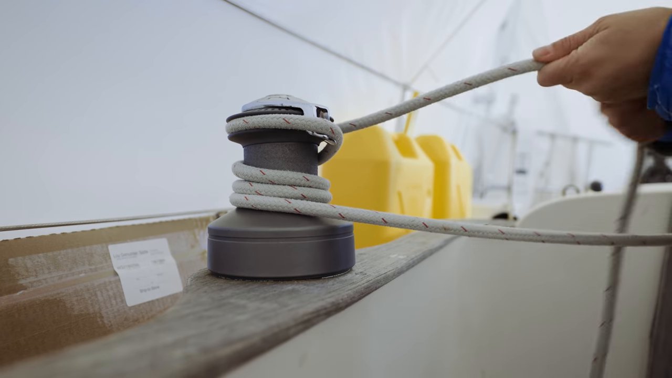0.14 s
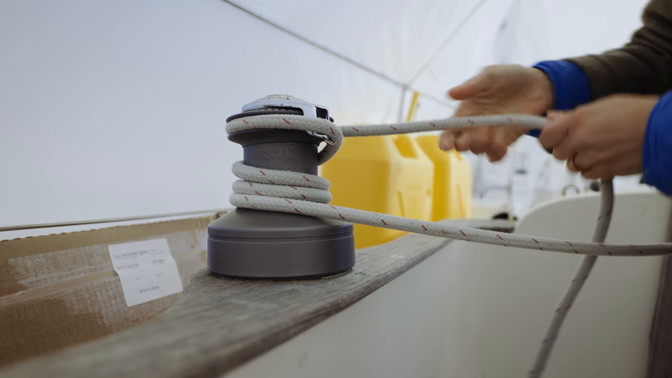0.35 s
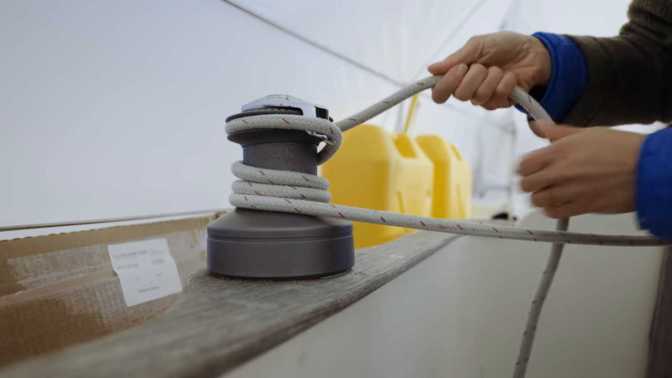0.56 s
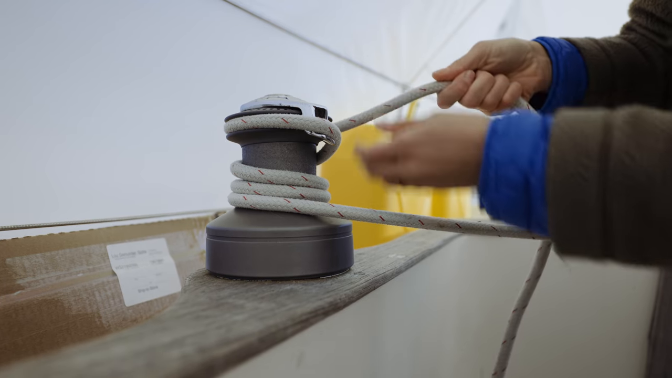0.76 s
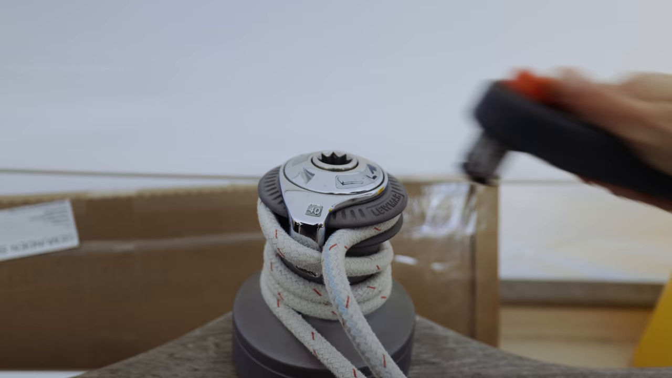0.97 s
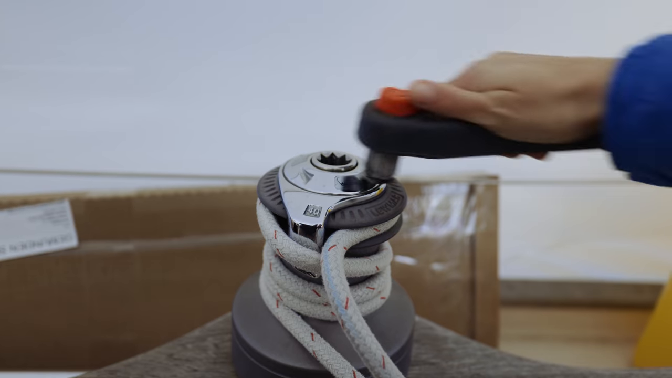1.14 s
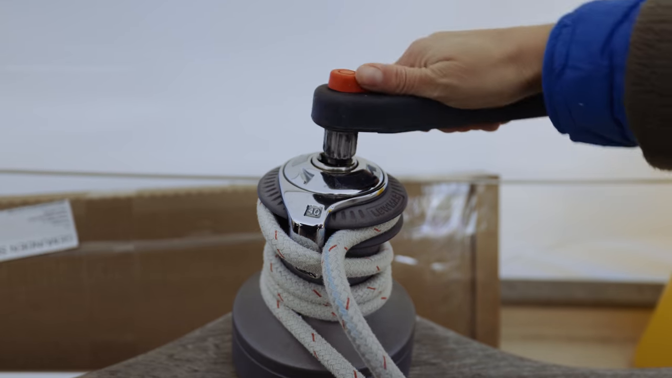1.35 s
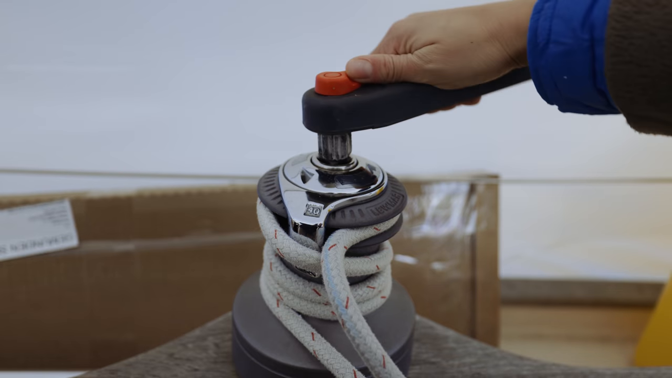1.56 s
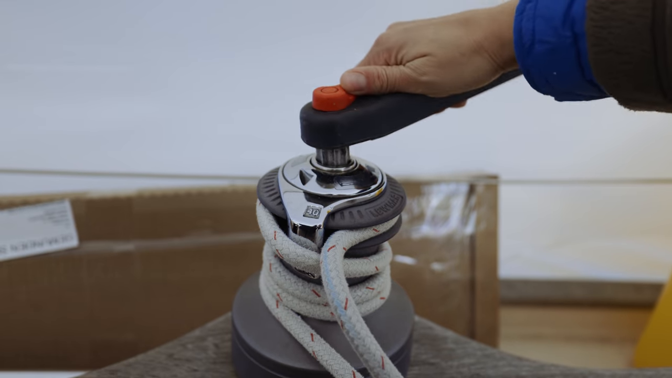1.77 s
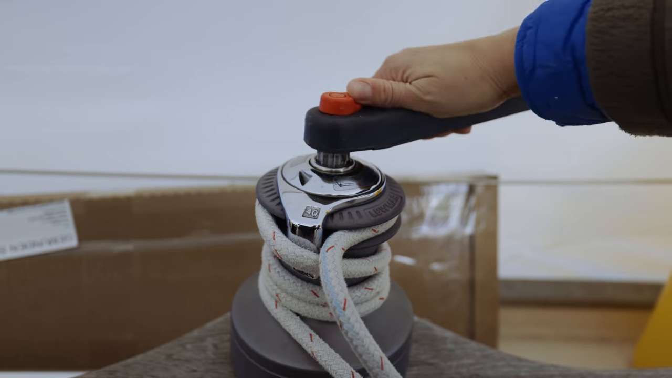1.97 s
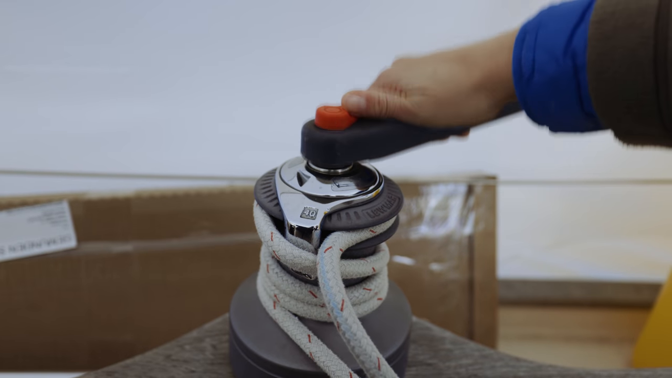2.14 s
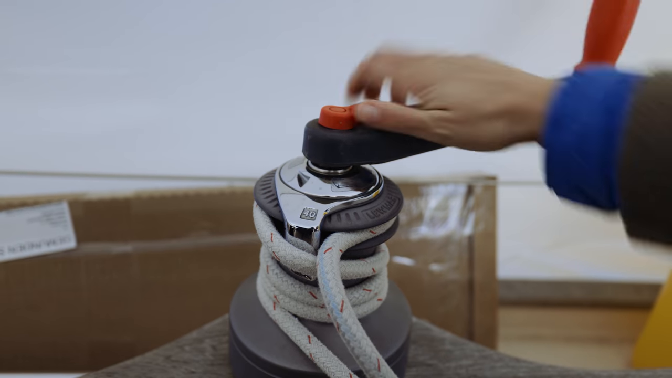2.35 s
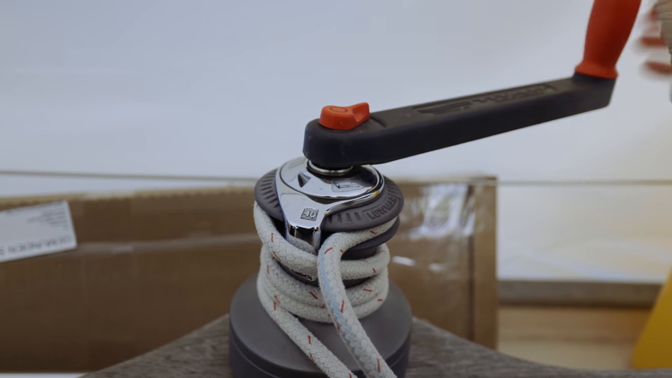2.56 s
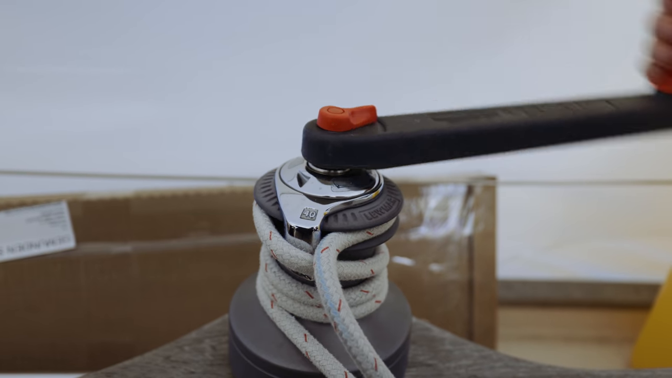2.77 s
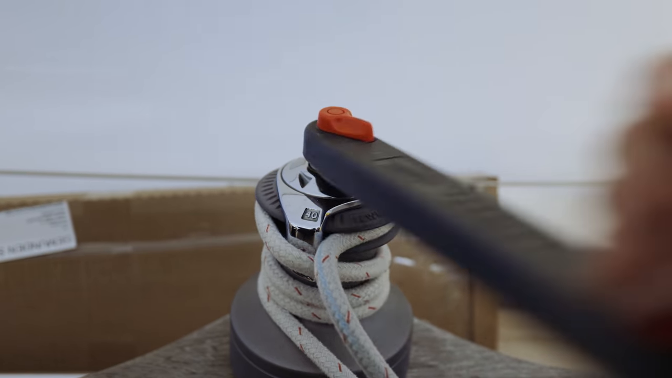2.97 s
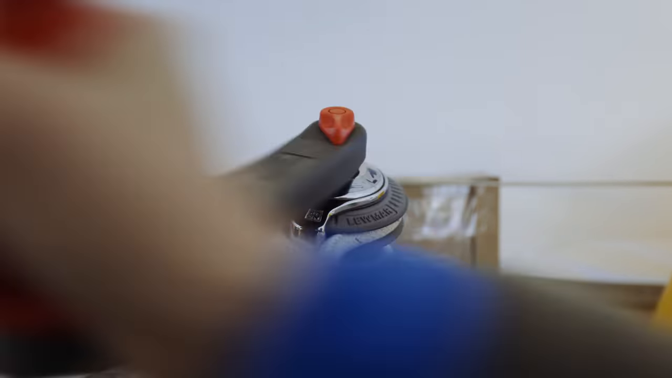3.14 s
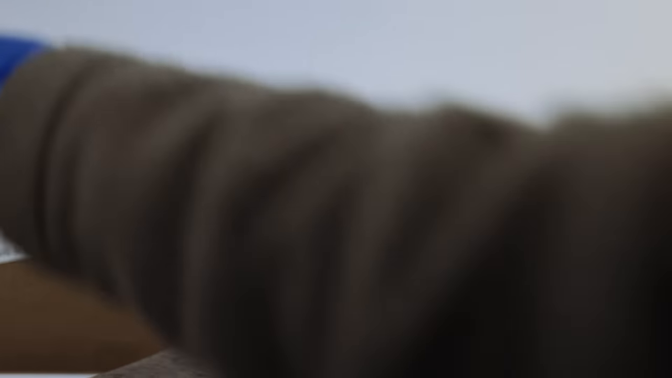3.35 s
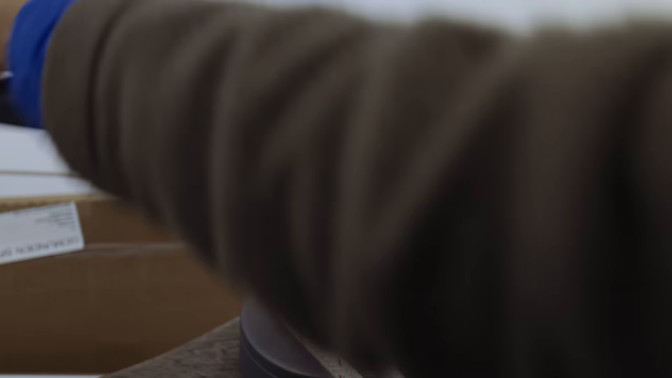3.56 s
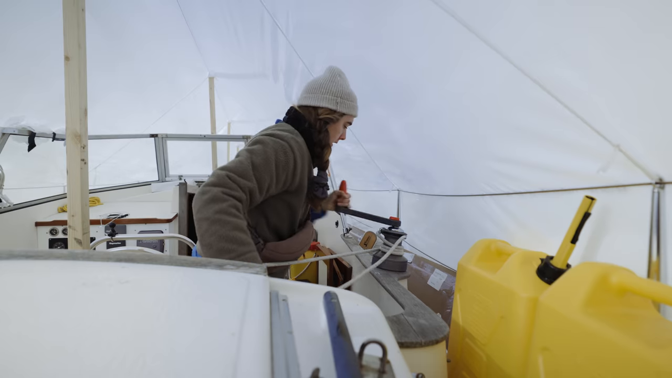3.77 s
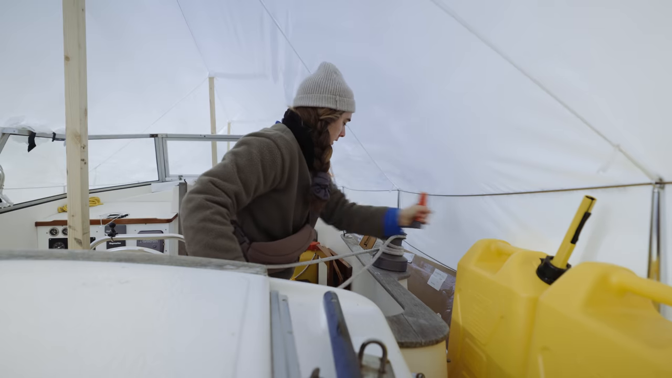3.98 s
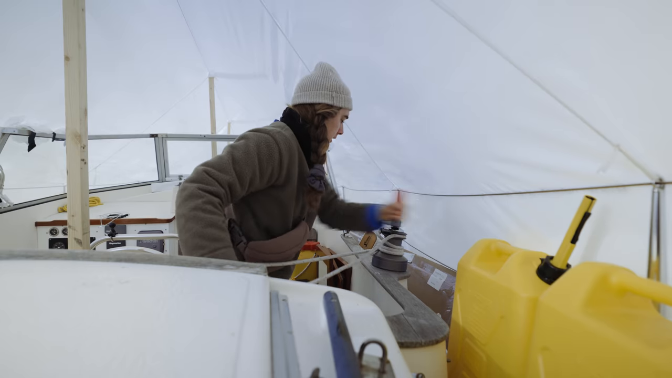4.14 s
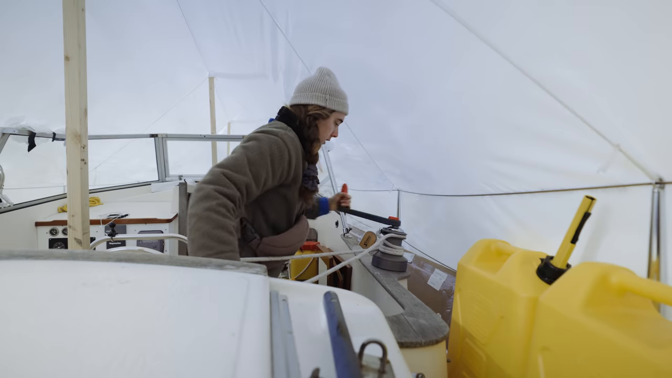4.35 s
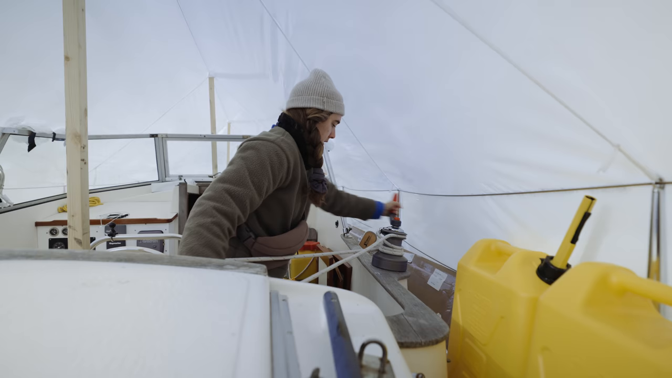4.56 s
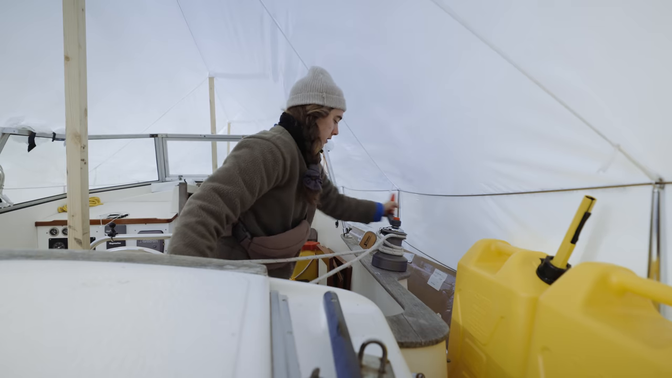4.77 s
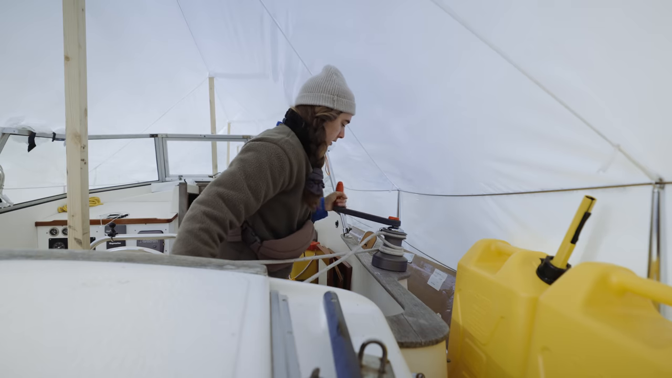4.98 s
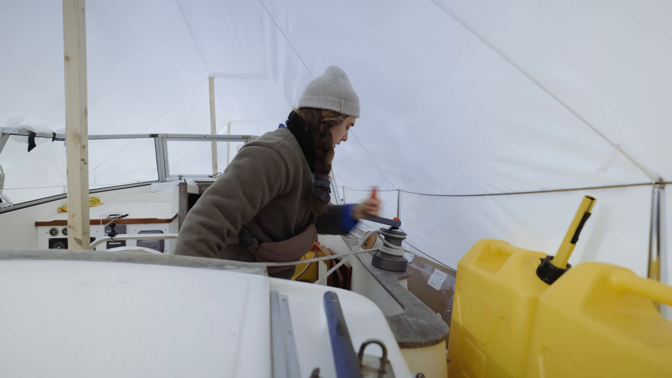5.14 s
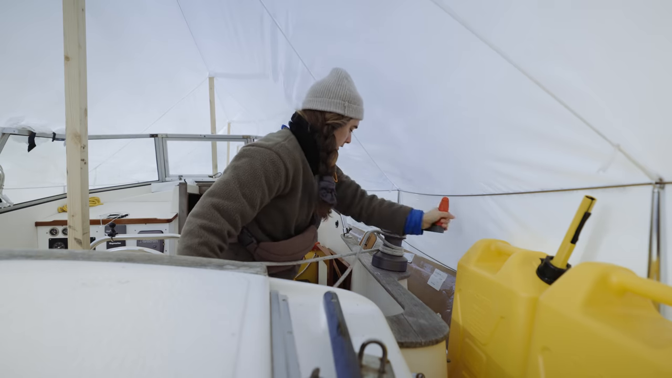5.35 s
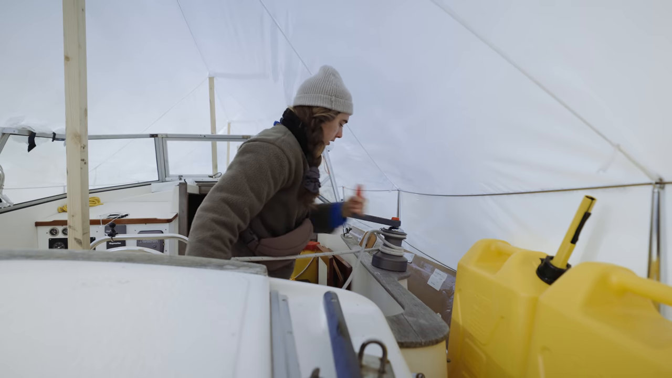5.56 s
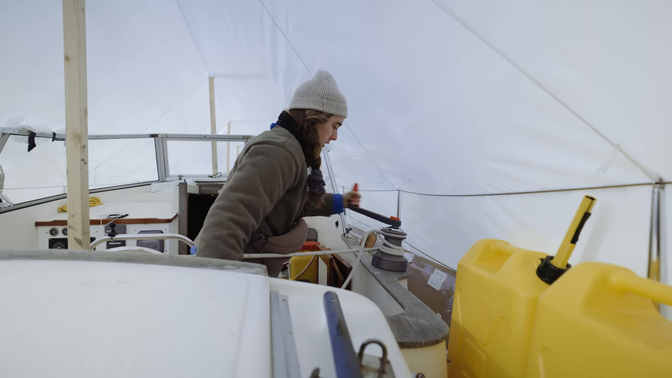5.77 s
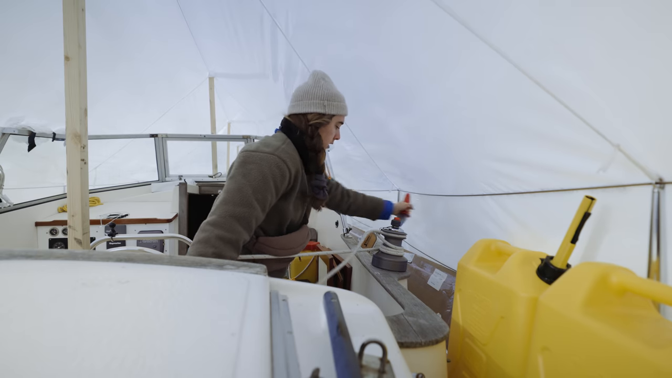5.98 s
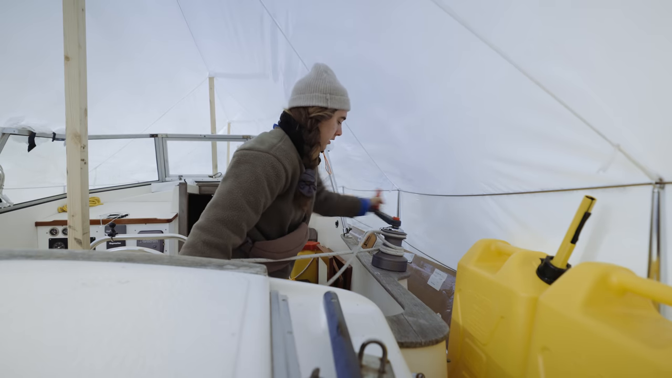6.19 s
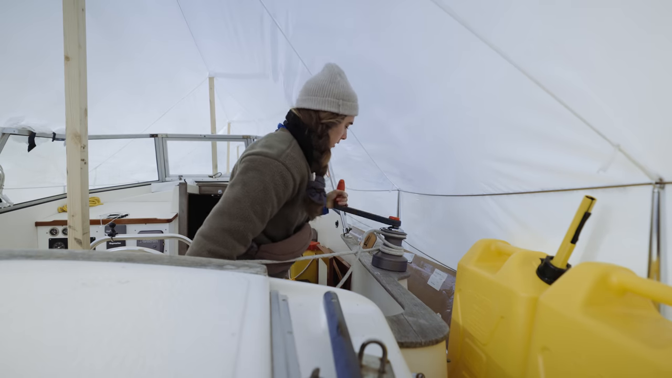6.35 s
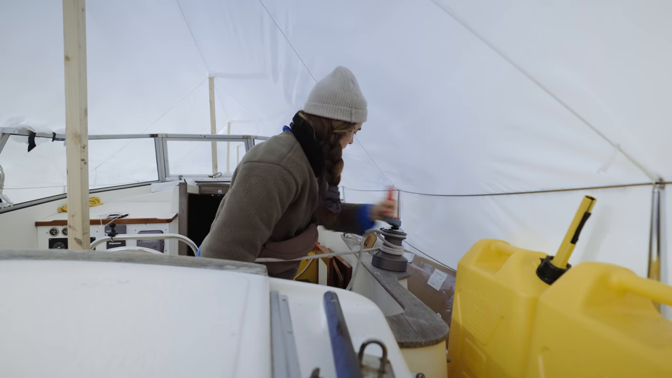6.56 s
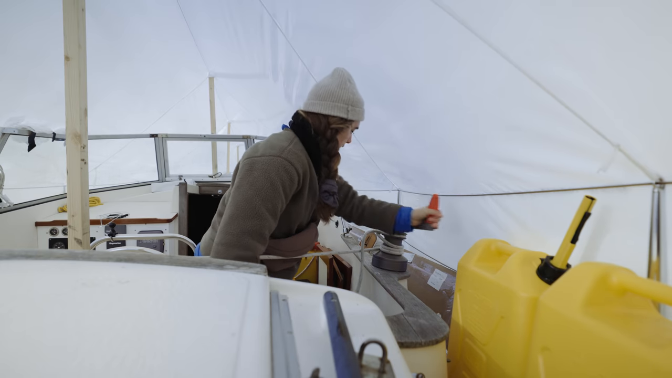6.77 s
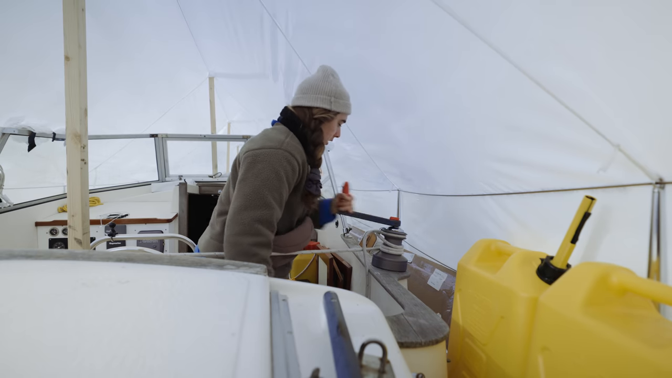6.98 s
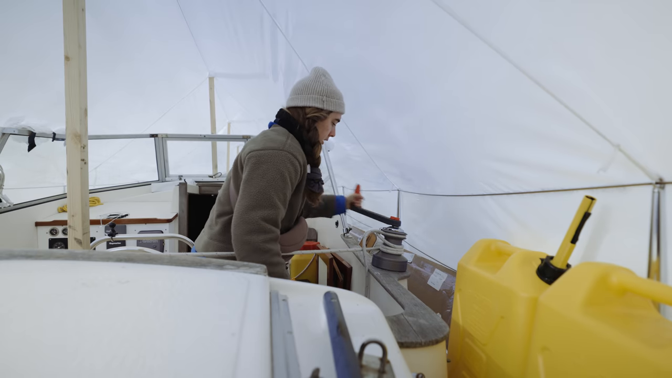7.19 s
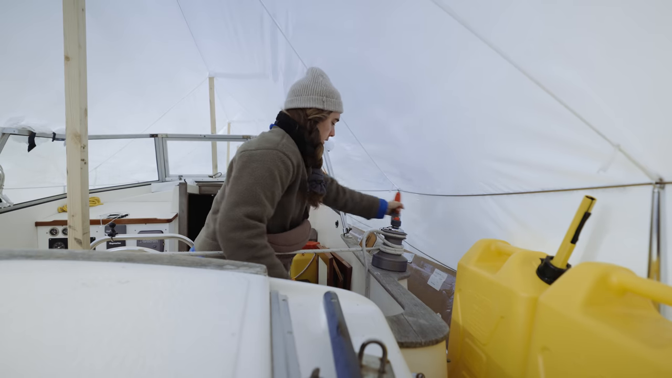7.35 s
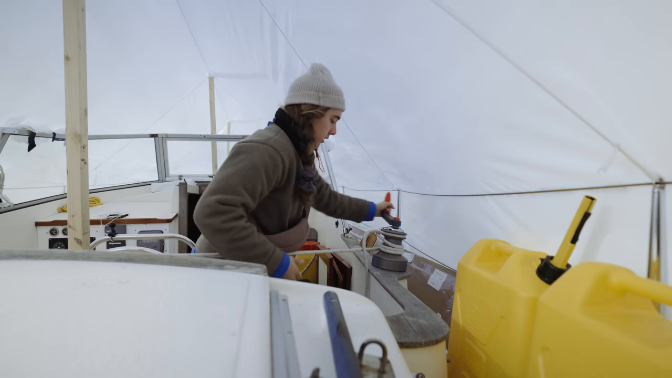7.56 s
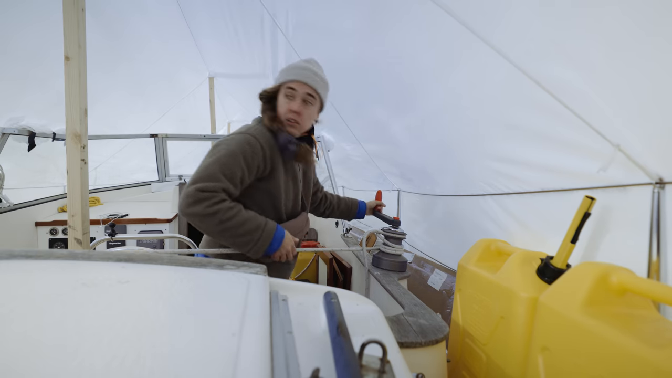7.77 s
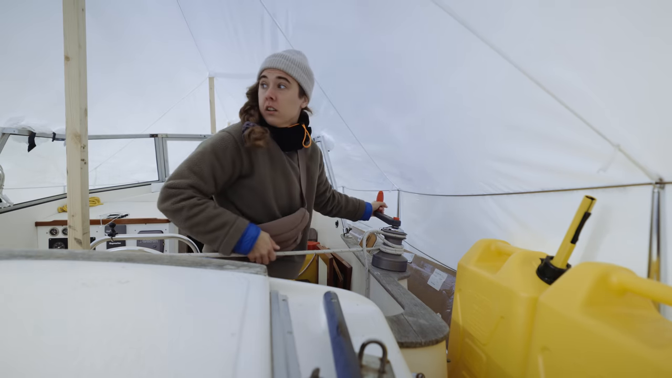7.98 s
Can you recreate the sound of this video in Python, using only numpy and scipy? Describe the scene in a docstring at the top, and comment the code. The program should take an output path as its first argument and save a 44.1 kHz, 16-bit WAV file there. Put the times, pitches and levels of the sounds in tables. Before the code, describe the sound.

A rope tug clicks the winch drum, its tail slapping and dragging briefly on deck. The handle bumps, ticks and snaps home. Then strokes of steel ratchet clicking alternate between two timbres, slower crisp high ticks and quicker ringing pings, with bearings whirring and hollow deck thumps at turnarounds. Close, detailed microphone, faint airy machinery background, small diffuse reflections from the thin cover.

```python
"""A two-speed deck winch under a plastic boat cover, in order of time. A rope tug spins the drum, which
clicks at once; the rope's tail slaps the deck and drags briefly. After one second the background fades
into a duller one without hum. The handle knocks and ticks as it is fitted and locked, then is cranked
to and fro: each direction trips its own pawls (struck, ringing steel), the bearings whirr (grainy noise)
and the gears clunk at the reversals. Knocks and pawls ring the hollow deck; the cover sends back echoes."""
import sys
import numpy as np
from scipy import signal
from scipy.fft import rfft, irfft, next_fast_len
from scipy.io import wavfile
from scipy.ndimage import map_coordinates

SR = 44100
rng = np.random.default_rng(int(sys.argv[2]) if len(sys.argv) > 2 else 0)


def wav_record(signal):
    """Record a signal, one row per channel, as 16-bit PCM in the file named by sys.argv[1]."""
    frames = np.transpose(np.atleast_2d(signal))
    bounded = np.clip(frames, -1, 1)
    # unit amplitude maps onto the largest positive 16-bit level
    quanta = np.round(bounded * 32767).astype(np.int16)
    wavfile.write(sys.argv[1], SR, quanta)


N = 353682  # length in samples, about 8 s


def amp(db):
    """Turns decibels into a plain factor."""
    return 10 ** (np.asarray(db) / 20)


def unit(x):
    """Scales a sound to an average (rms) strength of 1."""
    return x / np.sqrt(np.mean(x ** 2) + 1e-20)


def along(points, hz):
    """Reads a curve of (f/Hz, value) points on a logarithmic pitch axis."""
    f, value = np.transpose(points)
    return np.interp(np.log(hz + 1), np.log(f + 1), value)


def wobble(rate):
    """A smooth random curve with rate random points a second."""
    points = rng.standard_normal(int(N * rate / SR) + 4)
    return map_coordinates(points, [np.arange(N) * rate / SR])


def coloured(x, spectrum):
    """Gives x a tone colour with a filter that never rings ahead and keeps white noise at its rms."""
    size = 2048
    cepstrum = irfft(np.log(amp(along(spectrum, np.fft.rfftfreq(size, 1 / SR))) + 1e-6), size)
    # fold the second half onto the first: the filter then acts only after the sound
    cepstrum[1:size // 2] *= 2
    cepstrum[size // 2 + 1:] = 0
    kernel = irfft(np.exp(rfft(cepstrum)), size)
    return signal.fftconvolve(x, kernel / np.linalg.norm(kernel))[:N]


def add(track, s, sound):
    """Mixes a sound into the track at s seconds."""
    part = track[round(max(s, 0) * SR):][:len(sound)]
    part += sound[:len(part)]


def burst(spread):
    """Noise that swells for spread seconds (at least 0.2 ms) and dies away."""
    u = np.arange(SR // 8) / SR / max(spread, 2e-4)
    return u * np.exp(1 - u) * rng.standard_normal(len(u))


def ring(modes, attack, scatter_db, detune):
    """Damped modes struck together, each with a new strength and slightly shifted pitch; close ones beat."""
    hz, db, t60 = np.transpose(modes)[:, :, None]
    t = np.arange(int(SR * t60.max())) / SR
    strength, shift, start = rng.standard_normal((3, len(hz), 1))
    phase = 2 * np.pi * hz * (1 + detune * shift) * t + .6 * start
    envelope = amp(db + scatter_db * strength - 60 * t / t60)
    return (envelope * np.sin(phase)).sum(axis=0) * (1 - np.exp(-t / attack))


# background before and after the crossfade: f/Hz, relative level per Hz/dB
FIRST_AIR = [(20, -46), (40, 9), (90, 1.5), (300, -5), (640, -14.5), (2500, -16.5), (3500, -6.5),
             (5400, -18.5), (15500, -23.5)]
LATER_AIR = [(20, -21.5), (60, -5.5), (135, -0.5), (400, -14.5), (565, -8.5), (750, -17), (996, -9.5),
             (1120, -14.5), (1290, -14), (2300, -20.5), (3500, -13.5), (4700, -25.5), (15500, -37)]
HUM_HZ, CHANGE_S = 267, 1.013


def yard():
    """Air and far machinery: wavering coloured noise; a thin hum fades out with the first background."""
    t = np.arange(N) / SR
    fade = np.clip((t - CHANGE_S) / 0.25, 0, 1) * np.pi / 2
    first, later = (coloured(amp(wobble(26) / 2 + wobble(56)) * rng.standard_normal(N), spectrum)
                    for spectrum in (FIRST_AIR, LATER_AIR))
    hum = np.sin(2 * np.pi * HUM_HZ * t + 0.29 * wobble(5.6)) * amp(2.5 * wobble(8.7))
    return np.cos(fade) * (amp(-63.5) * first + amp(-66.0) * hum) + np.sin(fade) * amp(-58.5) * later


# what the thin sheet sends back: f/Hz, relative level/dB
ECHO = [(60, -11.5), (300, -0.5), (3500, -15.5), (6000, -4.5), (16000, -14)]
# how long the echo takes to fall by 60 dB: f/Hz, t60/s
COVER_DECAY = [(150, 0.39), (1000, 0.24), (3500, 0.34), (8000, 0.19), (15000, 0.26)]
# the near scatter starts first, weakened by EARLY_DB; the far sheet answers after RETURN_S
NEAR_S, RETURN_S, EARLY_DB = .006, .018, -8


def cover(x):
    """The cover's echo: each pitch dies at its own speed, with a fresh noise tail every fifth of a second."""
    wet, hop = np.zeros(N), SR // 5
    for start in range(0, N, hop):
        hz, t, grid = signal.stft(rng.standard_normal(SR // 2), SR, nperseg=256)
        level_db = along(ECHO, hz)[:, None] - 60 * t / along(COVER_DECAY, hz)[:, None]
        tail = signal.istft(grid * amp(level_db), SR, nperseg=256)[1]
        early = np.arange(len(tail)) < SR * (RETURN_S - NEAR_S)
        tail = tail * amp(EARLY_DB * early)
        echo = signal.fftconvolve(x[start:start + hop], tail / np.linalg.norm(tail))
        add(wet, start / SR + NEAR_S, echo)
    return wet


# tone of the rope scuffing over the deck: f/Hz, relative level per Hz/dB
DRAG = [(150, -30), (290, 0), (450, -6), (630, -2), (850, -8), (1270, -7), (1700, -22), (6000, -40)]
# tone of the gear housing's clunk, also lent to the rope slap: f/Hz, relative level per Hz/dB
CLUNK = [(350, -8), (600, -3.5), (1020, -8), (1310, -5), (2380, -11.5), (2800, -4.5), (4300, -12),
         (5500, -26.5), (7000, -28.5), (15400, -120)]
SLAP_S, SLAP_DB = .359, -41.5
# the drag fades slowly, then stops fast once it has lasted DRAG_S
DRAG_DB, DRAG_S, DRAG_FADE_DB_PER_S, DRAG_STOP_DB_PER_S = -47, 0.082, 30, 900


def rope():
    """The tail's slap is a bright puff; then braid scuffs dully over the deck in coarse grains."""
    slap, t = np.zeros(N), np.arange(N) / SR - SLAP_S
    add(slap, SLAP_S, amp(SLAP_DB) * (2 * burst(0.0011) + .5 * burst(0.013)))
    scuff = unit(coloured(amp(1.6 * wobble(123.0)) * rng.standard_normal(N), DRAG))
    drag_db = DRAG_DB - DRAG_FADE_DB_PER_S * t.clip(0) - DRAG_STOP_DB_PER_S * (t - DRAG_S).clip(0)
    return coloured(slap, CLUNK) + (t > 0) * amp(drag_db) * scuff


# ways the hollow deck rings: f/Hz, relative level/dB, t60/s
DECK = [(101, -6, 0.056), (202.6, 3, 0.052), (276.8, 2, 0.052), (386.6, -3.5, 0.076), (511.5, -6, 0.1),
        (777, -8, 0.078)]
# bright click of steel on steel: f/Hz, relative level per Hz/dB
TICK = [(4500, -24), (6000, -9), (8500, 0), (11000, -4), (15500, -5)]
# tilt that dulls the ticks of handle and gears: f/Hz, relative level/dB
GRIP = [(9000, 0), (15500, -9)]
THUD_SCATTER_DB = 2.5
SOFT_DB = 2.5  # loss of deck modes off the boom's pitch, per cycle of difference that a contact lasts
BOOM_DB, BOOM_T60_S = 7, .042  # the panel under the winch, its pitch set by the load on it


def knocks(table, body, tick_db, follows):
    """A contact of some length shakes the struck part, ticks in the treble and booms in the deck.
    The tick sits tick_db over the usual clack and follows a share of its swings."""
    usual = np.mean([row[1] for row in table])
    clacks, ticks, thuds = np.zeros((3, N))
    for s, clack, thud, spread, boom_hz in table:
        blow_and_grit = burst(spread) + amp(-12.0) * burst(4 * spread)
        add(clacks, s, amp(clack) * blow_and_grit)
        tick_and_rustle = burst(spread * 0.73) + amp(-11.5) * burst(spread + 0.0019)
        add(ticks, s, amp(usual + tick_db + follows * (clack - usual)) * tick_and_rustle)
        deck = [(boom_hz, BOOM_DB, BOOM_T60_S)]
        deck += [(hz, db - SOFT_DB * abs(hz - boom_hz) * spread, t60) for hz, db, t60 in DECK]
        boom = ring(deck, spread + 0.0033, scatter_db=THUD_SCATTER_DB, detune=0.03)
        add(thuds, s, amp(thud - 5.0) * boom)
    return coloured(clacks, body) + coloured(coloured(ticks, TICK), GRIP) + thuds


# dull bumps of rope and loose handle: t/s, clack level/dB, thud level/dB, contact length/s, boom f/Hz
BUMPS = [(0.433, -59, -38, 0.0039, 290), (0.954, -59, -49.5, 0.00073, 277),
         (1.461, -36, -32.5, 0.0011, 572), (1.795, -34, -24.5, 0.0023, 218),
         (1.921, -54, -28.5, 0.0087, 290), (1.935, -54.5, -27, 0.0042, 280),
         (2.187, -49.5, -27, 0.0057, 247), (2.797, -41.5, -28.5, 0.0048, 151),
         (2.811, -49, -29.5, 0.0073, 256), (7.621, -48.5, -31.5, 0.0072, 242),
         (7.766, -43, -30.5, 0.0057, 214)]


def bumps():
    """Rope and loose handle bump dully: contacts of varied length sound the housing and the deck."""
    return knocks(BUMPS, CLUNK, tick_db=-13, follows=1.0)


# sharp contacts of handle and socket: t/s, clack level/dB, thud level/dB, clack f/Hz
HANDLE = [(1.2995, -34, -33, 3570), (1.307, -33, -32.5, 3080), (1.3257, -28, -50, 3680),
          (1.4588, -34.5, -36, 2370), (1.5606, -39, -56, 2640), (1.578, -42, -39.5, 2620),
          (1.6003, -44, -36, 2720), (1.772, -49.5, -38.5, 1900), (1.9695, -54, -47, 2040),
          (2.201, -57, -38, 3200), (2.219, -51, -38, 2110), (2.2912, -14.5, -26.5, 2630),
          (2.7679, -32, -33, 2200), (7.7732, -43.5, -28, 3530)]
# tone of the handle arm: f/Hz, relative level per Hz/dB
CLACK = [(250, -10), (500, -7.5), (800, -14.5), (1600, -8), (2600, -2.5), (4100, -4.5), (5000, -29),
         (7000, -35), (12000, -70)]
CONTACT_S, ARM_DB = 0.0014, 12.5  # length of a sharp contact; the arm's note over the clack


def handle_contacts():
    """Handle and socket meet sharply: short noisy clacks, with a thud in the deck."""
    table = [(s, clack, thud, CONTACT_S, DECK[1][0]) for s, clack, thud, _ in HANDLE]
    return knocks(table, CLACK, tick_db=-7.5, follows=0.81)


def arm():
    """The plastic arm of the handle sounds a dead, short note whose pitch depends on the grip."""
    notes = np.zeros(N)
    for s, clack, _, hz in HANDLE:
        note = ring([(hz, 0, .009), (hz * 1.1, -4, .006)], .0004, scatter_db=2, detune=.02)
        add(notes, s + CONTACT_S, amp(clack + ARM_DB) * note)
    return notes


# the handle's steel catch: t/s, level/dB
CATCH = [(.96, -57), (1.3075, -39), (1.609, -51), (2.2001, -45), (2.3503, -48)]


def catch():
    """The steel catch ticks faintly in the socket: tiny bright bursts of noise."""
    ticks = np.zeros(N)
    for s, db in CATCH:
        add(ticks, s, amp(db) * burst(0.00091))
    return coloured(coloured(ticks, TICK), GRIP)


# strokes of the crank: start t/s, end t/s, deck rumble level/dB, whirr level/dB
STROKES = [(2.808, 3.64, -56, -57.5), (3.634, 4.295, -47.5, -49), (4.206, 4.868, -90, -52),
           (4.88, 5.554, -52.5, -48.5), (5.53, 6.237, -53, -48.5), (6.245, 6.942, -58, -46.5),
           (6.93, 7.483, -50, -45), (7.382, 7.673, -68, -47.5)]
# tone of the bearings: f/Hz, relative level per Hz/dB
WHIRR = [(350, -37), (1480, -51), (3640, -2), (6700, -4), (12000, -5), (15600, -5.5)]
# ringing of the gear wheels: f/Hz, relative level/dB
TEETH = [(1100, -5), (2900, 2), (3560, 6), (3780, 4), (4150, -3.5), (4600, -21)]
TEETH_T60_S = .032


def gears():
    """Loaded teeth rumble lumpily through the deck; bearings whirr in fine grains that ring the wheels."""
    t, rumble_gain, whirr_gain = np.arange(N) / SR, 0, 0
    for start, end, rumble_db, whirr_db in STROKES:
        progress = np.clip((t - start) / (end - start), 0, 1)
        speed = np.sin(np.pi * progress).clip(0) ** .75  # quick to start, quick to stop
        rumble_gain = rumble_gain + amp(rumble_db) * speed
        whirr_gain = whirr_gain + amp(whirr_db) * speed
    lumps = amp(10.2 * wobble(30)) * rng.standard_normal(N)
    rumble = signal.fftconvolve(lumps, ring(DECK, 0.00067, scatter_db=0, detune=0))[:N]
    grains = amp(5 * wobble(600) + 1.2 * wobble(40)) * rng.standard_normal(N)
    wheels = ring([(hz, db, TEETH_T60_S) for hz, db in TEETH], 0.00026, scatter_db=0, detune=0)
    song = signal.fftconvolve(grains, wheels)[:N]
    whirr = coloured(grains, WHIRR) + amp(7.5) * unit(song)
    return rumble_gain * unit(rumble) + whirr_gain * unit(whirr)


# gears scraping through their slack before a reversal bites: start t/s, end t/s, level/dB
SCRAPES = [(5.569, 5.575, -41), (6.94, 6.958, -49.5)]
# tone of the scrape: f/Hz, relative level per Hz/dB
SCRAPE_TONE = [(500, 1), (1400, 3), (2400, -2), (6000, -38)]


def scrapes():
    """Gritty noise while the gears slide through their slack, stopping when the teeth meet."""
    t = np.arange(N) / SR
    gain = sum(amp(db) * np.clip(np.minimum(t - start, end - t) / 0.00067, 0, 1)
               for start, end, db in SCRAPES)
    return gain * unit(coloured(amp(2.6 * wobble(430)) * rng.standard_normal(N), SCRAPE_TONE))


# gear slack taken up at reversals: t/s, clack level/dB, thud level/dB, contact length/s, boom f/Hz
REVERSALS = [(3.672, -61, -33, 0.0013, 218), (4.236, -35, -27, 0.0033, 267),
             (4.249, -32.5, -33, 0.0026, 307), (4.853, -44.5, -51, 0.0022, 200),
             (4.918, -35.5, -30, 0.0064, 201), (5.572, -33.5, -26, 0.0033, 210),
             (6.23, -62.5, -30, 0.008, 255), (6.261, -72.5, -34, 0.004, 220), (6.304, -26, -28, 0.004, 212),
             (6.315, -40, -16, 0.0026, 169), (6.966, -23, -16, 0.0037, 187)]


def reversals():
    """Gears take up their slack as the crank turns back: clunks in the housing and booms in the deck."""
    return knocks(REVERSALS, CLUNK, tick_db=-27.5, follows=1.34)


FLUTTER_DB, FLUTTER_S = 5, .006  # depth of the waver; time between its random points


def flutter(sound):
    """A ring that starts clear, then wavers as loose parts touch it."""
    knots = np.arange(len(sound)) / SR / FLUTTER_S
    touch = map_coordinates(rng.standard_normal(int(knots[-1]) + 2), [knots], order=1)
    return sound * amp(FLUTTER_DB * np.clip(knots - 1, 0, 1) * touch)


def seated(sound, free, damping_db):
    """The ring sounds freely until the pawl rests on the next tooth, free seconds later, and damps it."""
    t = np.arange(len(sound)) / SR
    return sound * amp(-damping_db / (1 + np.exp(-np.clip((t - free) / .0012, -50, 50))))


# tone of a pawl snapping on the housing: f/Hz, relative level per Hz/dB
SNAP = [(290, -27.5), (500, -11.5), (961, -14.5), (2080, -11.5), (2470, -13.5), (3630, -1), (4680, -9),
        (9000, -27), (11700, -27.5), (19800, -120)]
# ringing of the winch housing: f/Hz, relative level/dB struck by the direct pawls,
# relative level/dB struck by the reduction pawls and the free drum, t60/s
HOUSING = [(910, -5.5, -31, 0.067), (1292, 4, -2, 0.043), (1588, 4.5, -16, 0.035), (2096, 0, -2, 0.037),
           (2726, -1, -7.5, 0.048), (3380, -19, 12, 0.021), (3675, -30, 7.5, 0.029), (4170, -20, -8, 0.046),
           (4530, -35, -12, 0.06)]


def pawls(drops, low, high, order, high_db, follows, housing_db, thud_db,
          detune, attack, damping_db, scatter_db):
    """Each drop snaps on the housing, rings the ratchet and nudges the deck; the pawl rebounds and chatters.
    The high modes sit high_db over the usual ring and follow a share of its swings;
    order picks the column of housing levels that belongs to this set of pawls."""
    housing = [(row[0], row[order], row[3]) for row in HOUSING]
    snaps, ticks, tones = np.zeros((3, N))
    usual = np.mean([row[2] for row in drops])
    for s, snap, ring_low in drops:
        rebound, chatter, loose_db, free = rng.uniform([.003, .012, -4, .008], [.008, .03, 4, .015])
        add(snaps, s, amp(snap) * burst(0.0015))
        add(ticks, s, amp(snap - 8) * burst(0.002))
        add(snaps, s + rebound, amp(snap - 8.0) * burst(0.0042))
        add(snaps, s + chatter, amp(snap - 13.0 + loose_db) * burst(0.0054))

        shell = flutter(ring(housing, 0.0009, scatter_db=3, detune=0.045))
        add(tones, s, amp(snap + housing_db) * shell)
        low_ring = flutter(ring(low, attack, scatter_db=scatter_db, detune=detune))
        add(tones, s, amp(ring_low) * seated(low_ring, free, damping_db))
        high_ring = flutter(ring(high, attack / 2, scatter_db=1.5, detune=detune))
        high_level_db = usual + high_db + loose_db + follows * (ring_low - usual)
        add(tones, s, amp(high_level_db) * high_ring)
        thud = ring(DECK, 0.0022, scatter_db=THUD_SCATTER_DB, detune=0.088)
        add(tones, s, amp(snap + thud_db) * thud)
    return coloured(snaps, SNAP) + coloured(ticks, TICK) + tones


# clicks of the free drum: t/s, snap level/dB, ring level/dB
SPUN = [(0.0024, -24.5, -34), (0.0195, -29, -36)]
# ringing of the free drum, low and high group: f/Hz, relative level/dB, t60/s
DRUM_LOW = [(3650, 2, .05), (4390, 2, .2), (5250, -3, .4)]
DRUM_HIGH = [(10700, -8, .07), (11830, 0, .09)]


def spun_drum():
    """The free drum, spun by a tug on the rope, clicks and rings longest of all."""
    return pawls(SPUN, DRUM_LOW, DRUM_HIGH, order=2, high_db=1, follows=0.46, housing_db=-8.5,
                 thud_db=-8.5, detune=0.0039, attack=0.00065, damping_db=9, scatter_db=1.5)


# pawls dropping off a tooth in the reduction gear: t/s, snap level/dB, ring level/dB
REDUCED = [(2.9591, -30.5, -25), (3.028, -30.5, -27), (3.0955, -32.5, -26.5), (3.1837, -32, -30.5),
           (3.2763, -31.5, -31), (3.3615, -30, -35), (3.4424, -31.5, -32.5), (3.5375, -31, -35),
           (4.3092, -33, -31), (4.3533, -34.5, -37), (4.3995, -33, -33), (4.4448, -33.5, -34.5),
           (4.5093, -33.5, -37), (4.587, -34, -30), (4.6602, -33, -30.5), (4.7371, -35, -31),
           (5.6456, -31.5, -26.5), (5.6976, -33.5, -29), (5.7488, -30, -27), (5.7947, -32, -30.5),
           (5.8468, -34, -34), (5.9414, -32, -32), (6.0157, -33, -27), (6.0952, -32.5, -33),
           (7.0438, -35.5, -31), (7.102, -33.5, -23), (7.1592, -34, -22.5), (7.208, -31, -28),
           (7.3137, -31.5, -28.5), (7.3846, -32.5, -29), (7.4611, -31.5, -31)]
# ringing of its ratchet, low and high group: f/Hz, relative level/dB, t60/s
REDUCED_LOW = [(9580, -9, .03), (10200, -7, .04), (10750, -3, .028), (11200, 0, .025), (11450, -1, .02),
               (11850, -4, .022)]
REDUCED_HIGH = [(14280, 0, .028), (14520, -3, .02), (14800, -3, .018), (15150, -2, .022), (15550, -6, .015)]


def reduction_pawls():
    """Pawls of the reduction gear ring their ratchet high and briefly."""
    return pawls(REDUCED, REDUCED_LOW, REDUCED_HIGH, order=2, high_db=-2.5, follows=0.92, housing_db=-6.0,
                 thud_db=-11.5, detune=0.003, attack=0.0006, damping_db=22, scatter_db=3)


# pawls dropping off a tooth in the direct gear: t/s, snap level/dB, ring level/dB
DIRECT = [(3.702, -34.5, -28.5), (3.7407, -32.5, -19.5), (3.7771, -34, -21), (3.8055, -36.5, -28),
          (3.8342, -36.5, -24), (3.8623, -34, -30.5), (3.9, -35.5, -22.5), (3.9479, -36.5, -36),
          (3.9929, -35.5, -29), (4.0367, -38, -34), (4.0771, -38, -25.5), (4.122, -36.5, -23.5),
          (4.1894, -39, -22), (4.9774, -38, -17.5), (5.0145, -34.5, -31), (5.0514, -31.5, -24),
          (5.088, -31, -19), (5.1277, -31, -30), (5.1713, -32.5, -17.5), (5.2202, -36, -21.5),
          (5.2661, -37.5, -25.5), (5.3103, -34, -27), (5.353, -34.5, -20.5), (5.3979, -35, -33),
          (5.462, -36.5, -35), (6.3608, -37.5, -24.5), (6.3944, -35, -19.5), (6.4326, -38, -20.5),
          (6.4727, -38, -20.5), (6.5175, -35.5, -21.5), (6.568, -34, -53), (6.6216, -33, -20),
          (6.6694, -31, -23), (6.7097, -31, -40), (6.7504, -32, -27), (6.7986, -38.5, -25)]
# ringing of its ratchet, low and high group: f/Hz, relative level/dB, t60/s
DIRECT_LOW = [(5170, -7, .08), (5232, 0, .13), (5300, -6, .07), (5480, -13, .025)]
DIRECT_HIGH = [(11830, -5, .12), (11890, -1, .04), (12300, -5, .02)]


def direct_pawls():
    """Pawls of the direct gear ring their ratchet lower, with close modes that beat."""
    return pawls(DIRECT, DIRECT_LOW, DIRECT_HIGH, order=1, high_db=-10.5, follows=0.23, housing_db=-6.0,
                 thud_db=-6.5, detune=0.002, attack=0.004, damping_db=28, scatter_db=1.5)


# tone of the handle's sound on its way to the cover: f/Hz, relative level/dB
CLOSE = [(1500, -14), (2500, -1), (4400, 0)]


def scene():
    """Adds the direct sounds, the cover's echo of winch and handle, and the background."""
    handle = handle_contacts()
    winch = spun_drum() + direct_pawls() + reduction_pawls() + bumps() + reversals() + scrapes() + catch()
    echo = cover(amp(-12.0) * winch + amp(-11) * coloured(handle, CLOSE))
    return (winch + handle + arm() + echo + rope() + gears() + yard())[None]


TOP_HZ = 16600  # nothing is kept from here up


def record(dry):
    """The microphone chain cuts deep bass, rounds hard peaks, dips near 16 kHz and ends at its band limit."""
    dry = signal.sosfilt(signal.butter(3, 75, "high", fs=SR, output="sos"), dry)
    dry = dry / (1 + np.abs(dry / .34) ** 4) ** (1 / 4)
    size = next_fast_len(N + 8192)
    hz = np.fft.rfftfreq(size, 1 / SR)
    response = amp(along([(15750, -1.0), (16000, -38), (16600, -13)], hz)) * (hz < TOP_HZ)
    return irfft(rfft(dry, size) * response, size)[..., :N]


dry = scene()
out = record(dry)
wav_record(out)
```